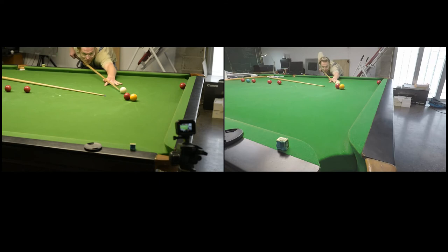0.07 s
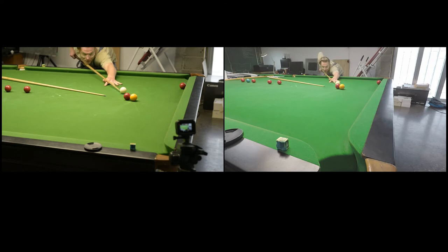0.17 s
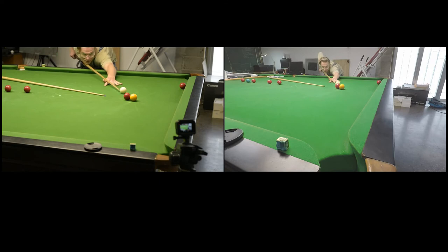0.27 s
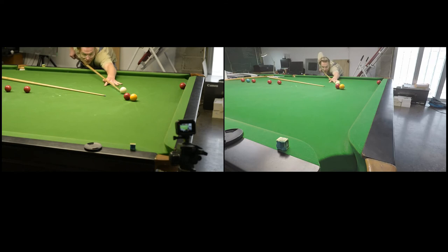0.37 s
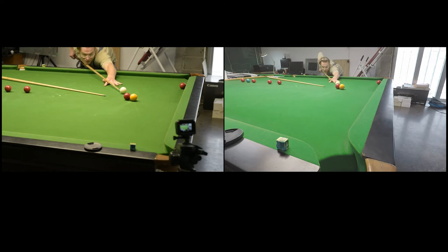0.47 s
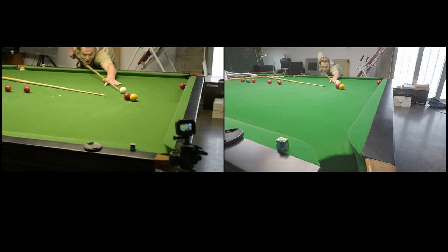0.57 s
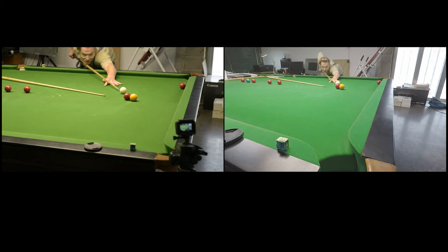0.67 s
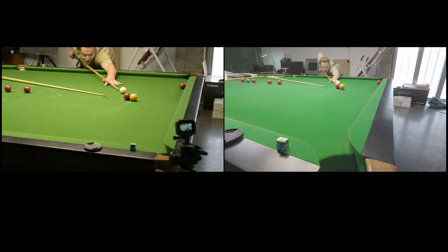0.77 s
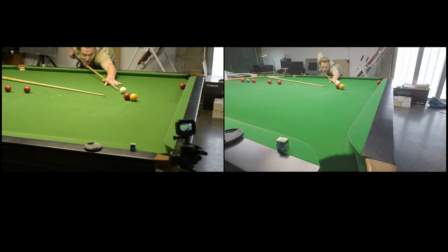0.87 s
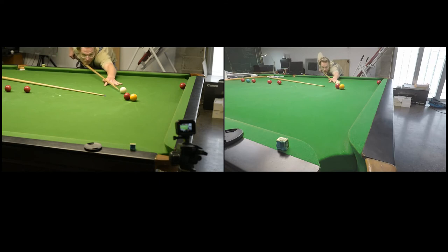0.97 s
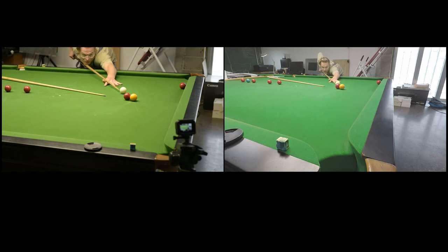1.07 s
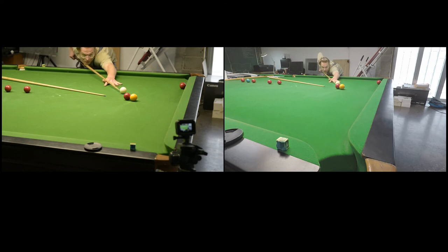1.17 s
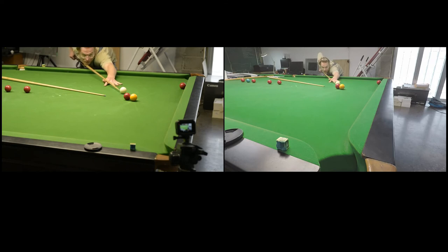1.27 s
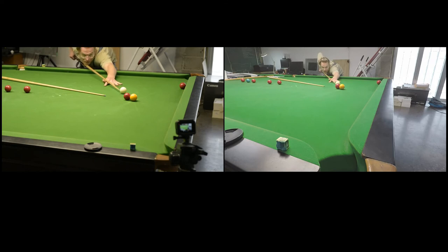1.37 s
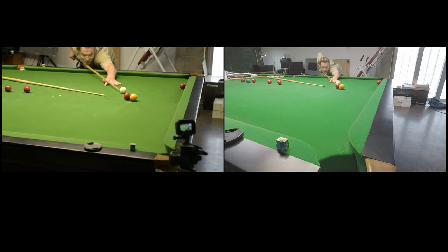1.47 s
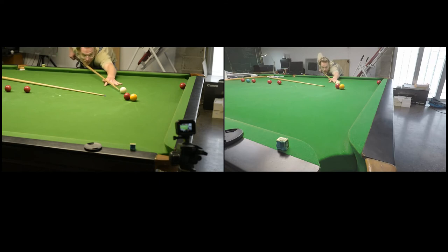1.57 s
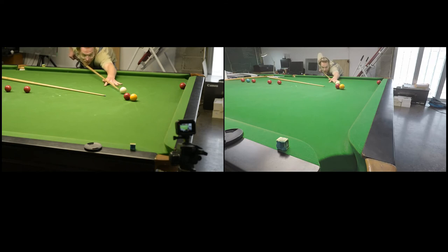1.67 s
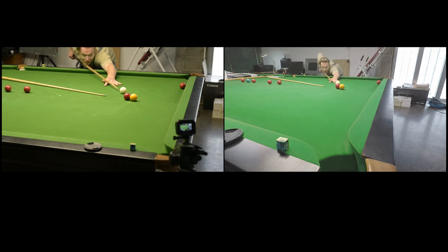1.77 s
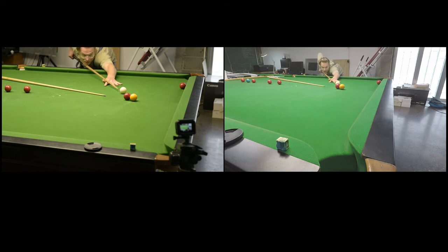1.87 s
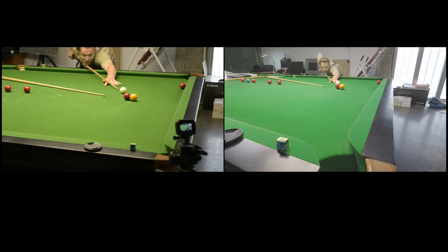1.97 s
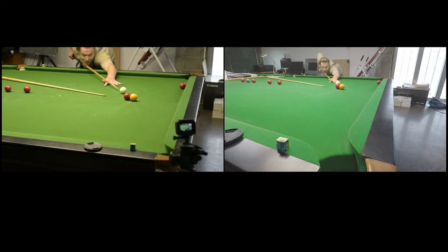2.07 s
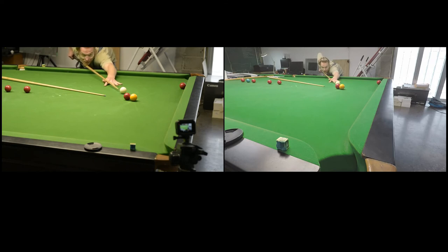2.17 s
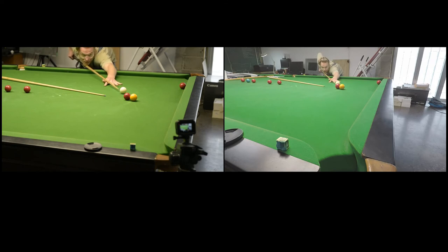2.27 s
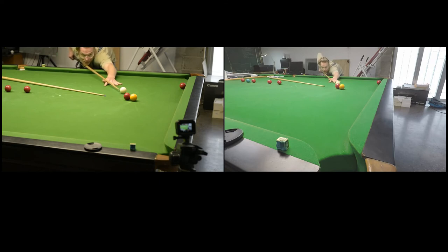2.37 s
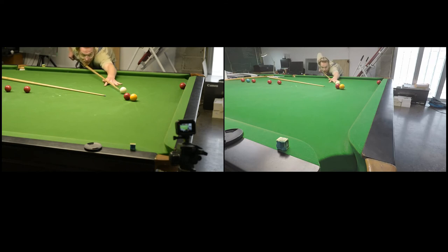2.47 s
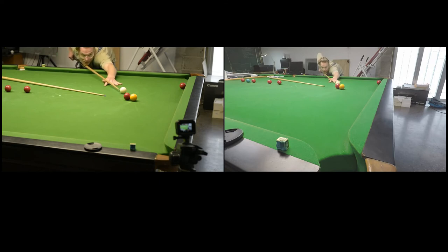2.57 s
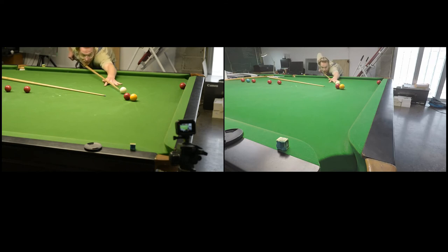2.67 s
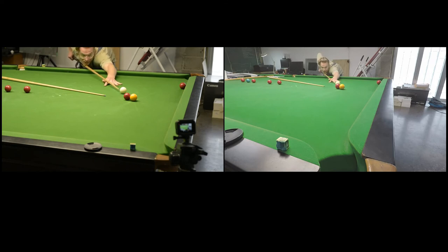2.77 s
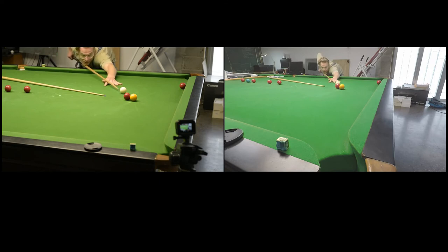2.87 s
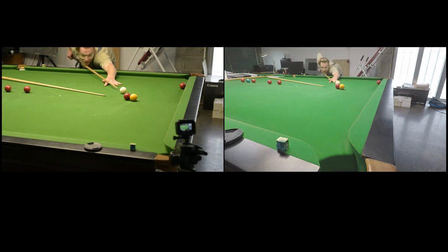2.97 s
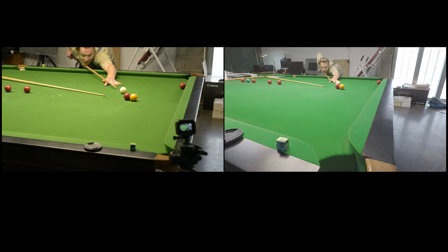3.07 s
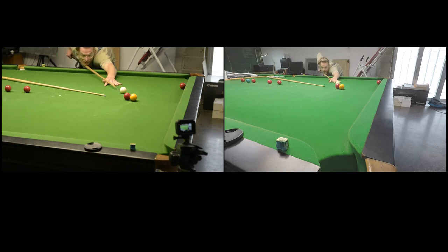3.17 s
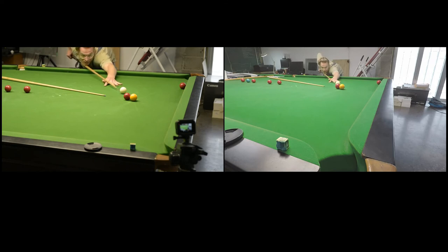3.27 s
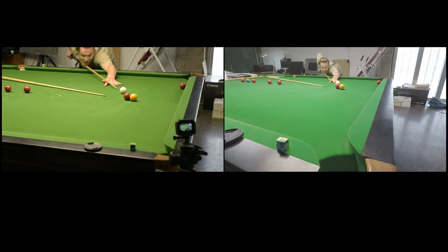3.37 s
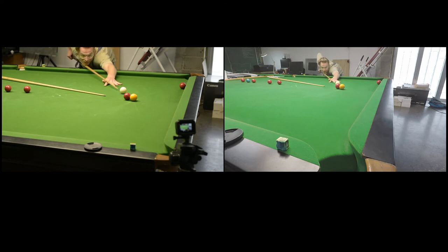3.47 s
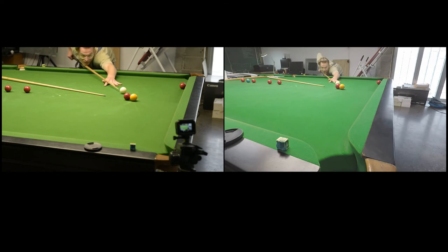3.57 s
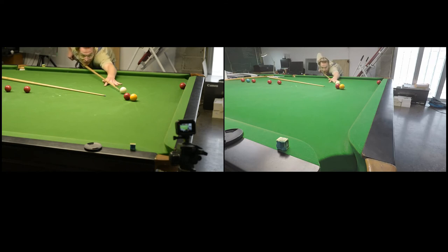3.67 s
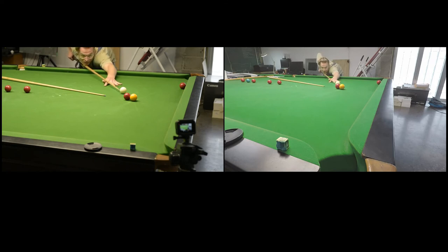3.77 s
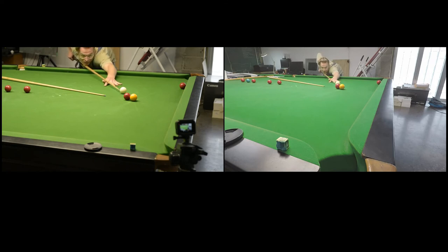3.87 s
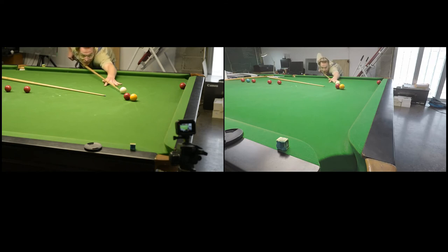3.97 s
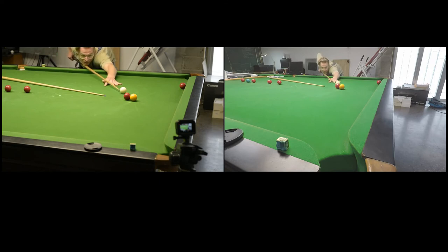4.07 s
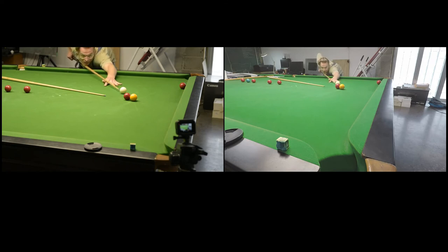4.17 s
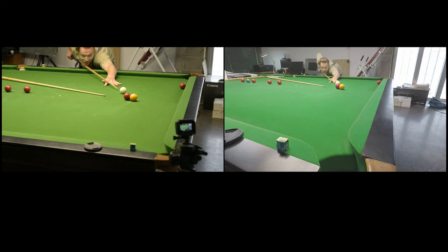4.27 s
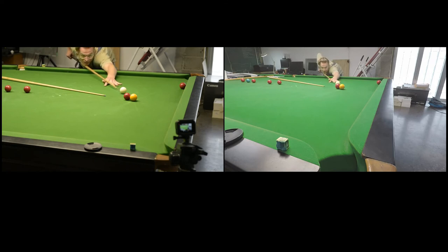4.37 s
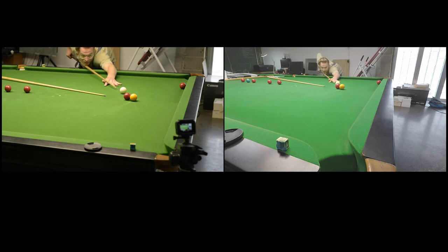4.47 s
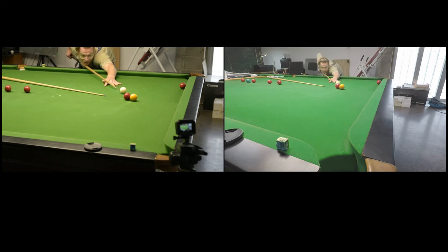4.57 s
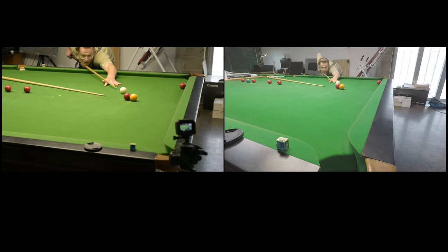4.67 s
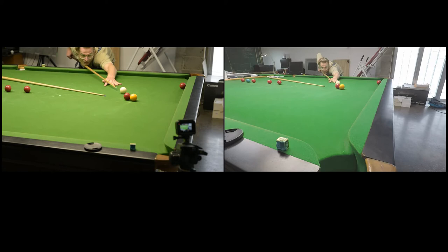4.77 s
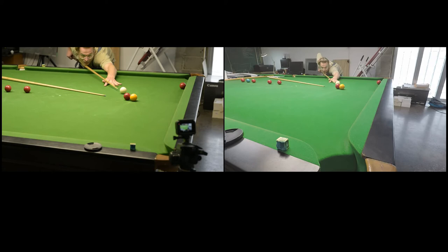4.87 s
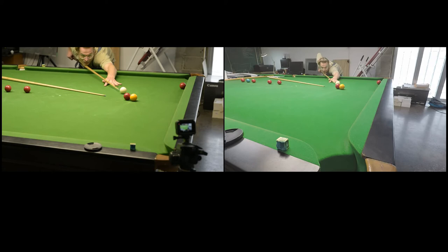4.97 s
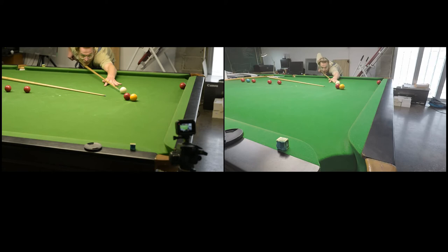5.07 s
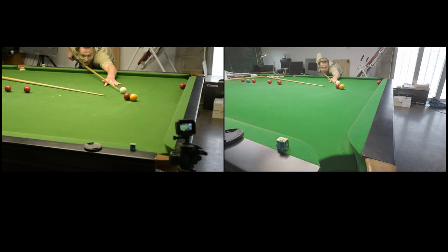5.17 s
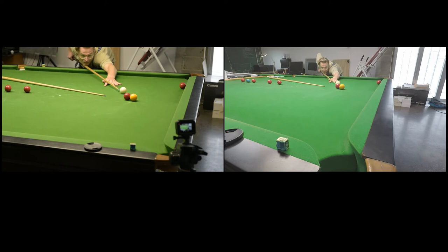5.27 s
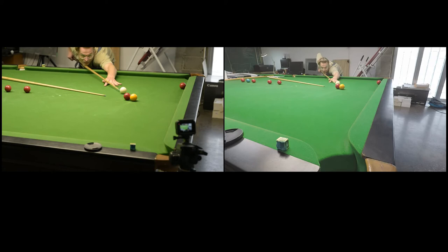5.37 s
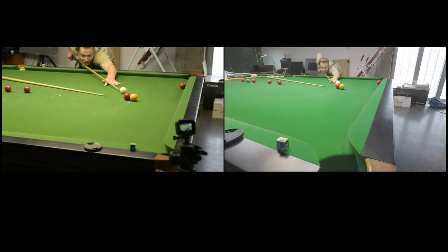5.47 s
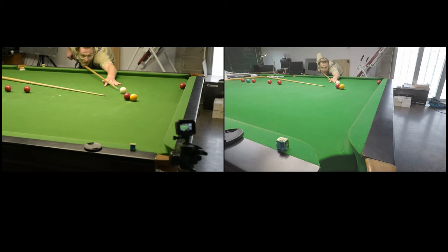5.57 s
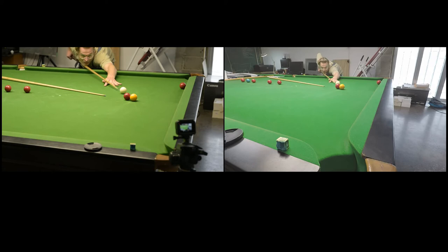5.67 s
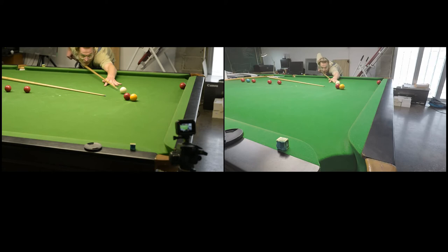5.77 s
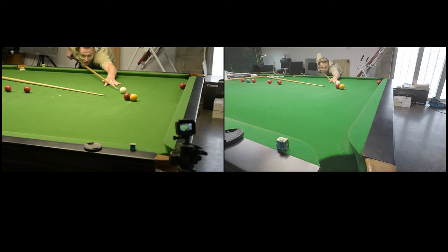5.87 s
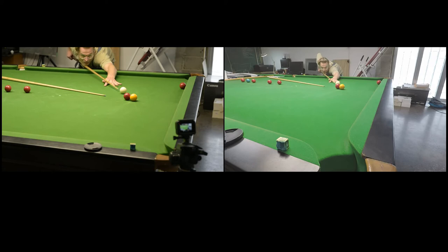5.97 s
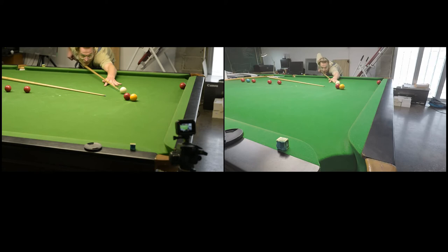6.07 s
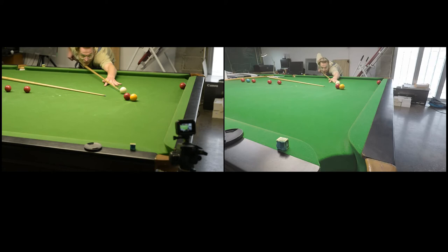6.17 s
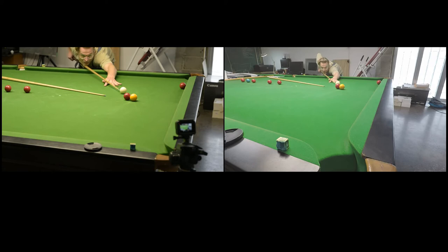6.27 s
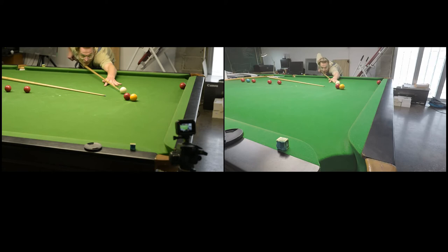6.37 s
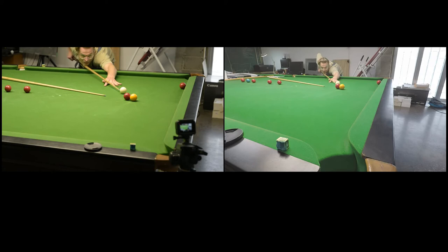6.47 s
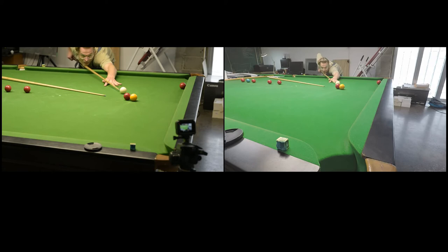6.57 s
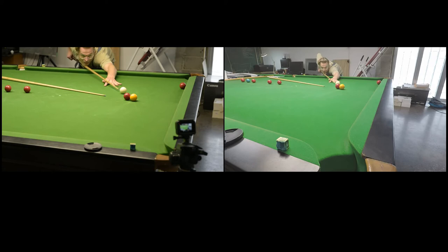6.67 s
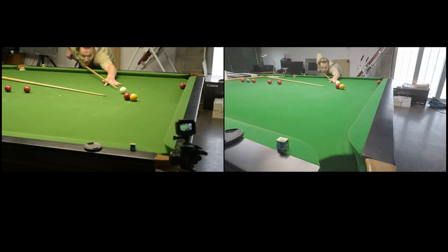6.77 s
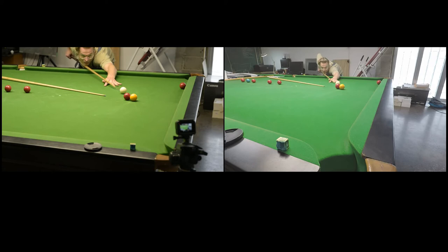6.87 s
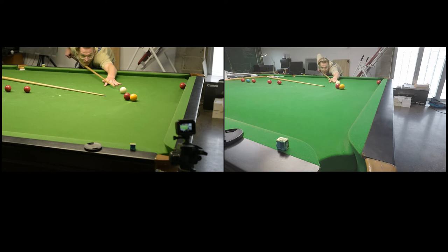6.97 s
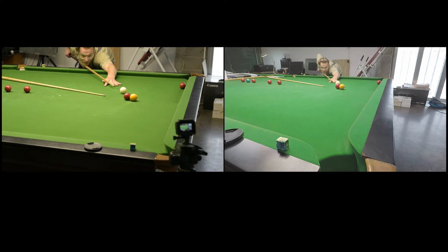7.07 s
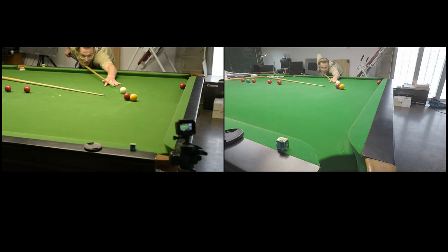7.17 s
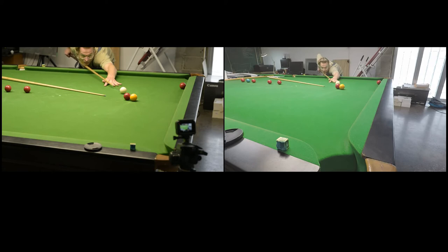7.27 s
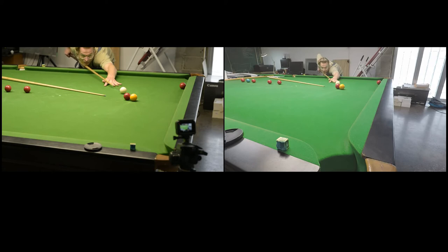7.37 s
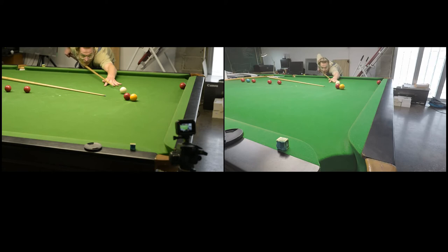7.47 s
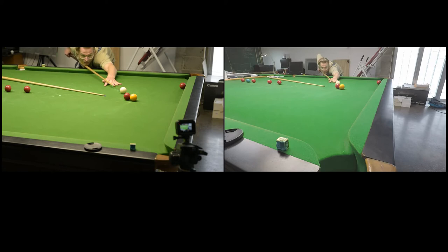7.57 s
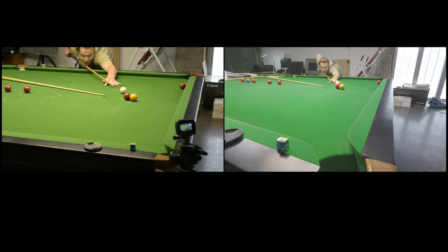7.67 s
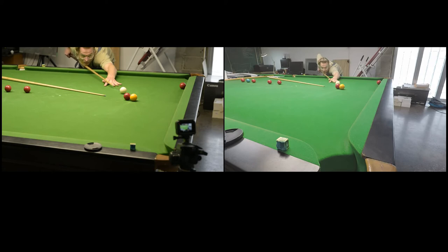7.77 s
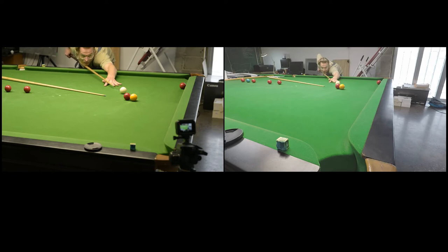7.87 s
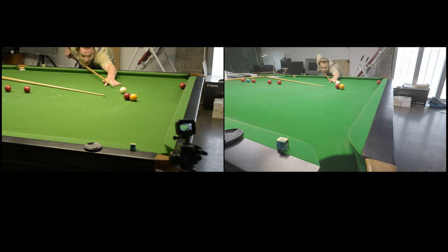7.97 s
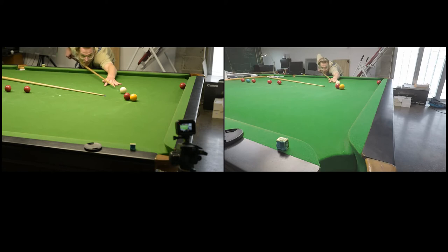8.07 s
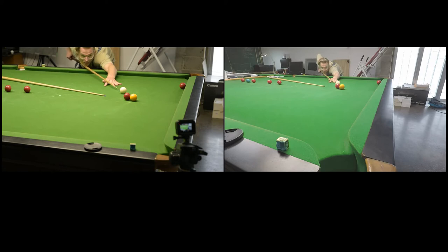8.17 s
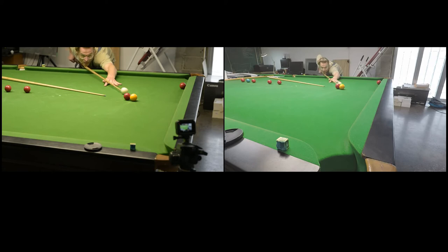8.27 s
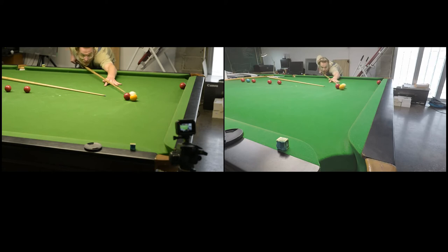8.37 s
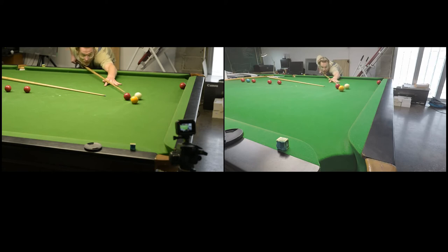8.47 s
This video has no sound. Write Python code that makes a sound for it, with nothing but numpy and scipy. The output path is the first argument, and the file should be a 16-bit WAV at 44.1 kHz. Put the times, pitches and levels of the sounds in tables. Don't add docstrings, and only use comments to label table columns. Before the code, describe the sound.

A quiet snooker room: soft low fan rumble with mains hum, under a steady thin high whine, fine electrical buzz and brief hissy chatter bursts from the camera's own circuits. Near the end the leather cue tip knocks the white ball with a woody ring, and an instant later balls collide in a very loud hard clack, with room echo.

```python
import sys
import numpy as np
from scipy import signal
from scipy.fft import rfft, irfft
from scipy.io import wavfile

SR = 44100
rng = np.random.default_rng(int(sys.argv[2]) if len(sys.argv) > 2 else 0)


def inscribe(sig):
    pcm = np.round(np.clip(np.atleast_2d(sig).T, -1, 1) * 32767)
    wavfile.write(sys.argv[1], SR, pcm.astype(np.int16))


def volts(x):
    e = np.asarray(x, float) / 20
    return 10 ** e


N = 375732
TIME = np.arange(N) / SR


def level(x, db):
    return x * volts(db) / np.sqrt(np.mean(x ** 2))


def band(x, hz, width_hz):
    return signal.lfilter(*signal.iirpeak(hz, hz / width_hz, fs=SR), x)


def ring(x, modes):
    out = 0
    for hz, db, t60 in modes:
        pole = np.exp(2j * np.pi * hz / SR - np.log(1000) / (t60 * SR))
        out = out + volts(db) * signal.lfilter([1], [1, -pole], x).imag
    return out


def left_right(left_db, right_db):
    return volts(np.array([[left_db], [right_db]]))


def stereo(likeness, size):
    mid, side = rng.standard_normal((2, size))
    return np.sqrt(1 + likeness) * mid + np.sqrt(1 - likeness) * side * np.array([[1], [-1]])


# frequency in Hz, density in dB per Hz.
AIR_SPECTRUM = [(20, -20), (43, -13), (82, -5), (105, 4.5), (125, -3.5), (140, -8), (205, -5.5),
                (260, -11.5), (500, -16.5), (1000, -20.5), (4000, -28), (9000, -25.5), (14600, -33.5),
                (15700, -21)]
# frequency in Hz, left-right likeness 0-1.
AIR_LIKENESS = [(60, 0.8), (110, 0.89), (190, 0.65), (330, 0.48), (590, 0.12), (1040, 0.16), (1840, 0),
                (3260, 0.16)]


def air():
    log_hz = np.log(np.maximum(np.fft.rfftfreq(N, 1 / SR), 1))
    points, like = np.array(AIR_SPECTRUM), np.array(AIR_LIKENESS)
    shape = volts(np.interp(log_hz, np.log(points[:, 0]), points[:, 1]))
    share = np.clip(np.interp(log_hz, np.log(like[:, 0]), like[:, 1]), 0, 1)
    noise = rfft(rng.standard_normal((2, N)))
    mid, side = noise * shape * np.sqrt([1 + share, 1 - share])
    return level(irfft([mid + side, mid - side], N), -51.5)


# multiple of the mains frequency, level in dB rms.
HUM = [(6, -71), (7, -82), (8, -64.5), (10, -69), (12, -78.5), (13, -72.5), (14, -82), (15, -79),
       (16, -76.5), (17, -78.5), (20, -83.5), (24, -83), (26, -88), (28, -84.5)]


def hum():
    mains_hz = 49.92
    out = np.zeros((2, N))
    for multiple, db in HUM:
        phase, spread = rng.uniform(0, 2 * np.pi, 2)
        phases = phase + np.array([[0], [0.16 * spread]])
        out += volts(db) * np.sin(2 * np.pi * multiple * mains_hz * TIME + phases)
    return np.sqrt(2) * out


def scan_line():
    line_hz, line_db, pan_db = 15734.27, -54, -1.8
    tone = np.sin(2 * np.pi * line_hz * TIME)
    return np.sqrt(2) * left_right(line_db + pan_db / 2, line_db - pan_db / 2) * tone


WHINE_HZ = np.array([5294.1, 10588.2, 7995.6, 11800, 11994])
# start in seconds, left level in dB, signed share at the right port.
WHINE = [(1.39, -60, -.4), (1.39, -77, .6), (0, -63, -.45), (0, -81, .6), (0, -85, .6)]


def whine():
    out = np.zeros((2, N))
    for hz, (start, db, share) in zip(WHINE_HZ, WHINE):
        tone = (TIME > start) * np.sin(2 * np.pi * hz * TIME)
        out += volts(db) * np.array([[1], [share]]) * tone
    return np.sqrt(2) * out


# frequency in Hz, level in dB, t60 in seconds.
BUZZ_MODES = [(7650, -47.5, 0.0087), (7870, -52.5, 0.0072), (6730, -58, 0.004), (8500, -87, 0.001),
              (5700, -96, 0.00087), (12000, -75, 0.00067)]


def buzz():
    frame_hz, start_ms, pair_ms, tick_ms = 50.0054, 6.5, 4.737, .907
    frames = np.arange(int(N / SR * frame_hz)) / frame_hz + start_ms / 1000
    delays = np.array([0, tick_ms, pair_ms, pair_ms + tick_ms]) / 1000
    at = (frames[:, None] + delays).ravel() * SR
    size = volts(1.55 * rng.standard_normal((len(at), 1)))
    near = at.astype(int)[:, None] + np.arange(-8, 9)
    ticks = np.zeros(N + SR)
    np.add.at(ticks, near, size * np.sinc(near - at[:, None]) * np.hanning(19)[1:-1])
    return ring(ticks[:N], BUZZ_MODES) * np.array([[1], [-volts(-7)]])


# start in seconds, length in seconds.
CHATTER = [(.263, 0.09), (.388, .035), (1.218, .112), (2.176, .114), (3.135, .108), (3.622, 0.11),
           (4.577, 0.12), (5.564, 0.078), (5.682, 0.055), (6.02, 0.12), (6.976, 0.12), (7.936, 0.12)]
# centre in Hz, width in Hz, level in dB.
CHATTER_BANDS = [(10200, 250, -8), (7680, 300, -2), (10700, 450, 1), (8200, 630, 3), (6600, 900, -0.5)]
# frequencies in Hz, then levels in dB in the same order.
CHATTER_TONE_HZ = np.array([10116, 10216, 7460, 7555])
CHATTER_TONE_DB = [-1, -1, -1, -2]


def chatter():
    rise_ms, fall_ms, beat_hz = 3.5, 12, 100
    gate = np.zeros(N)
    for start, length in CHATTER:
        rise = np.clip((TIME - start) * 1000 / rise_ms, 0, 1)
        fall = np.clip((start + length - TIME) * 1000 / fall_ms + 1 / 2, 0, 1)
        gate += rise * fall
    throb = 1 + .4 * np.sin(2 * np.pi * beat_hz * TIME)
    hiss = sum(level(band(stereo(1 / 2, N), hz, width_hz), db) for hz, width_hz, db in CHATTER_BANDS)
    tones = sum(level(np.sin(2 * np.pi * hz * TIME), db)
                for hz, db in zip(CHATTER_TONE_HZ, CHATTER_TONE_DB))
    return volts(-67) * gate * (throb * hiss + tones) * left_right(0, -5)


def blow(since, push_ms):
    u = since / (push_ms / 1000)
    return (1 - u ** 2) * np.exp(-u ** 2 / 2)


def fade(since, decay_ms):
    return (since > 0) * np.exp(-np.abs(since) * 1000 / decay_ms)


def crack(since, decay_ms, hz):
    noise = rng.standard_normal(len(since))
    return fade(since, decay_ms) * band(band(noise, hz, hz), hz, hz)


def shake(since, decay_ms, likeness):
    x = fade(since, decay_ms) * stereo(np.clip(likeness, 0, 1), len(since))
    return x / np.sqrt(np.sum(x ** 2) / 2)


# frequency in Hz, level in dB, t60 in seconds.
SLATE = [(112, -55, 0.12), (198, -54, 0.15), (274, -47.5, 0.1), (423, -48, 0.091), (684, -38.5, 0.053)]


def thud(since):
    push = np.exp(-(since / .0001) ** 2)
    return band(ring(push, SLATE), 360, 900)


SHAFT_HZ = [847, 1046, 1291, 1860, 2140, 2515, 2800, 3590]
# level in dB, t60 in seconds.
SHAFT = [(-33, 0.078), (-21, 0.11), (-21, 0.21), (-22, .045), (-18, 0.054), (-13, 0.047), (-20, 0.036),
         (-28, 0.098)]


def cue(t):
    since = t - 8.27897
    after = since - 2.7 / 1000
    shaft = ring(shake(after, 3.1, 0.9), [(hz, *mode) for hz, mode in zip(SHAFT_HZ, SHAFT)])
    rough_hz, rough_width_hz = 2600, 1800
    rough = band(shake(after, 12, 0.9), rough_hz, rough_width_hz)
    rough = volts(4) * band(rough, rough_hz, rough_width_hz)
    crush = volts(-29.5) * crack(since + 0.0019, 56, 6330)
    return volts(-6) * (blow(since, .265) + shaft + rough + thud(since) + crush)


# time in seconds, level in dB.
RATTLE = [
    (8.2832, -38),
    (8.2925, -32),
    (8.3036, -20),
]


def rattle(t):
    ticks = sum(volts(db) * blow(t - at, 0.027) for at, db in RATTLE)
    return band(ticks, 10500, 3000) * left_right(4, -6)


def balls(t):
    since = t - 8.40806
    jolt = band(blow(since, .11), 2480, 1250)
    skid = band(shake(since - 1.2 / 1000, 8.3, 0.57), 800, 590)
    knock = volts(-5) * skid + volts(-19.5) * thud(since)
    bright = volts(-26) * crack(since, 1.5, 7500)
    return volts(11.5) * (jolt / jolt.max() + knock + bright)


# band centre in Hz, level in dB, t60 in seconds, left-right likeness 0-1.
TAIL = [(149, -35, 1, 1), (402, -38, 0.84, 1), (850, -37, 1, 0.5), (1700, -44.5, .9, 0),
        (2960, -45.5, .9, 0), (6540, -42.5, 0.86, 0), (12000, -43, 0.7, 0)]


def room(size, echoes):
    n = np.arange(size)
    out = np.zeros((2, size))
    direct = (0.0079, 0.0095, -.5, 0.95)
    for ms, db, pan_db, lag in [direct] + echoes:
        at = 8 + ms * SR / 1000
        arrival = np.sinc(n - at - np.array([[lag], [0]]))
        out += left_right(db + pan_db / 2, db - pan_db / 2) * arrival
    rise_ms = 10
    build_up = 1 - np.exp(-n / SR * 1000 / rise_ms)
    for hz, db, t60, likeness in TAIL:
        decay = volts(-60 * n / SR / t60)
        out += volts(db) * band(stereo(np.clip(likeness, 0, 1), size), hz, hz) * decay * build_up
    return out


# delay in ms, level in dB, left minus right in dB, left lag in samples.
CUE_ECHOES = [(5.75, -11, 0, 0), (9.4, -14, 0, 0), (11.6, -13, 0, 0), (16.2, -12, -2, 1), (17.3, -9, 0, 0),
              (20.0, -10, -1, 0), (21.0, -9, -1, 0), (22.0, -13, -1, 2)]
# delay in ms, level in dB, left minus right in dB, left lag in samples.
BALL_ECHOES = [(1.6, -26, 0, 1), (3.5, -22, -3, 2), (5.3, -12.5, -2, 2), (6.15, -16.5, 1, 0),
               (11.8, -26, 2, 0), (13.3, -25, -8, 2), (14.8, -26, 4, 0), (17.35, -17, -1, 3),
               (19.42, -13.5, -1, 3), (21.42, -17, 1, 1), (22.25, -22, 8, 0), (24.9, -22, 0, 1)]


def strikes(t):
    out = 0
    for blows, echoes in [(cue(t), CUE_ECHOES), (balls(t), BALL_ECHOES)]:
        response = room(len(t), echoes)
        out = out + signal.fftconvolve(np.atleast_2d(blows), response, axes=1)[:, :len(t)]
    return out


def scene():
    out = air() + hum() + scan_line() + whine() + buzz() + chatter()
    start = int(8.2 * SR)
    t = TIME[start:]
    out[:, start:] += strikes(t + 8 / SR) + rattle(t)
    return out


def top_cut(x):
    return signal.sosfilt(signal.butter(12, 15762, fs=SR, output="sos"), x)


def record(dry):
    mix = np.clip(dry, -1, 1)
    return top_cut(mix)


dry = scene()
out = record(dry)
inscribe(out)
```